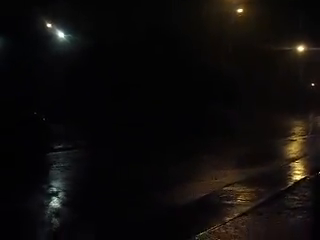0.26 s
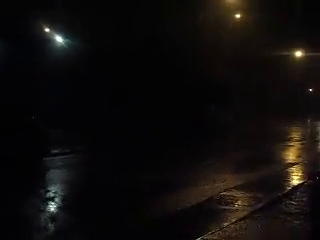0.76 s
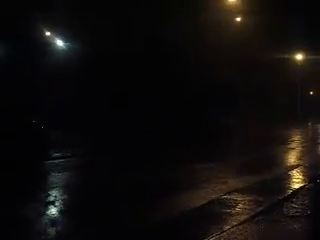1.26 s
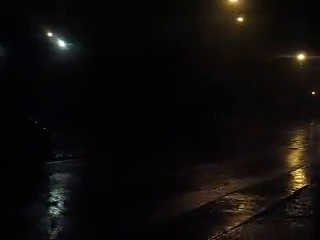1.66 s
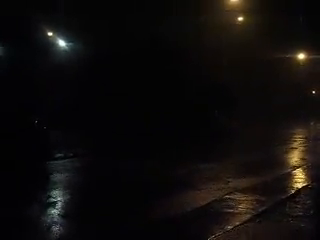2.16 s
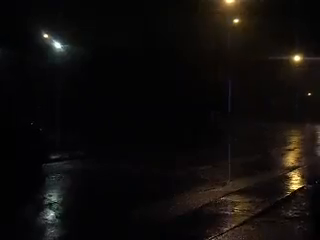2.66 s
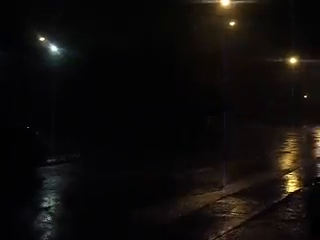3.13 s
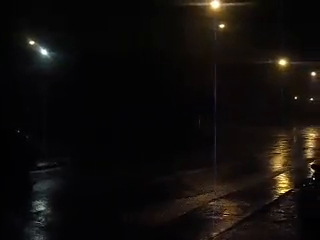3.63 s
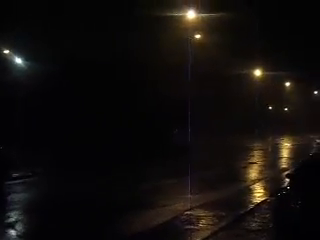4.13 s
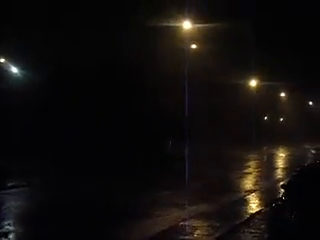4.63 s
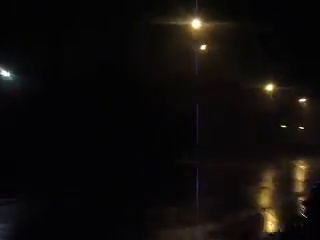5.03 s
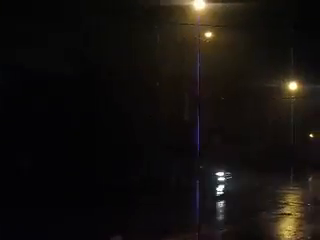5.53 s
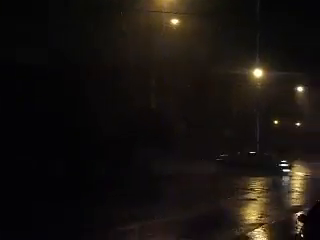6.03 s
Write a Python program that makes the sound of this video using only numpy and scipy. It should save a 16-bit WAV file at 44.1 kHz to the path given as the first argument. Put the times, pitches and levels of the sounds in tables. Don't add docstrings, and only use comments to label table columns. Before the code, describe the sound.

A small, dull camera microphone in a tight car cabin catches a downpour: continuous roof patter, sharp glassy ticks with tiny splashes, irregular body thumps with wet scraping, and a broad rainy hiss from the street. A low rumble slowly rises as a car approaches. The rain swells and eases, breaks off abruptly just after five seconds, and comes back suddenly, ending at its heaviest. Mono, dry, slightly grainy treble.

```python
import sys
import numpy as np
from scipy import signal
from scipy.fft import rfft, irfft
from scipy.io import wavfile
from scipy.ndimage import uniform_filter1d

SR = 44100
rng = np.random.default_rng(int(sys.argv[2]) if len(sys.argv) > 2 else 0)


def linear_from_db(decibels):
    return 10 ** (np.asarray(decibels, float) / 20)


def dump(signal):
    limited = np.clip(np.atleast_2d(signal).T, -1, 1)
    pcm = np.round(limited * 32767).astype(np.int16)
    wavfile.write(sys.argv[1], SR, pcm)


N = 277389


def evened(x):
    return x / np.sqrt(np.mean(x ** 2) + 1e-20)


def read(points, hz):
    f, value = np.transpose(points)
    return np.interp(np.log(hz + 1), np.log(f + 1), value)


def coloured(x, gain):
    return irfft(rfft(x) * gain(np.fft.rfftfreq(len(x), 1 / SR)), len(x))


def band(x, lo_hz, hi_hz):
    return signal.sosfilt(signal.butter(2, [lo_hz, hi_hz], "bandpass", fs=SR, output="sos"), x)


def add(mix, start_s, sound):
    part = mix[round(start_s * SR):][:len(sound)]
    part += sound[:len(part)]


def clicks(per_s, spread_db):
    size = linear_from_db(spread_db * np.minimum(rng.exponential(1, N), 4))
    return size * (rng.random(N) < per_s / SR)


# t/s, level/dB
RAIN_STRENGTH = [(0.0, -41), (0.45, -39), (1.03, -35.5), (1.38, -40.5), (1.78, -37.5), (2.05, -41.5),
                 (2.35, -42.5), (2.601, -38.5), (2.92, -38), (3.24, -38), (3.73, -41.5), (4.2, -40),
                 (4.57, -41), (4.9, -42.5), (5.36, -40.5), (5.62, -36.5), (5.9, -35), (6.29, -34)]
USUAL_DB = -39


def strength_db(follows):
    s, db = np.transpose(RAIN_STRENGTH)
    return follows * (np.interp(np.arange(N) / SR, s, db) - USUAL_DB)


# f/Hz, width/Hz, level/dB
ROOF_MODES = [(830, 110, -4), (849, 200, -5), (1025, 200, -4.5), (1292, 370, -2), (542, 220, -11)]


def roof(hits, shift):
    t = np.arange(800) / SR
    out = 0
    for hit, stretch, (hz, width_hz, db) in zip(hits, shift, ROOF_MODES):
        mode = np.exp(-np.pi * width_hz * t) * np.sin(2 * np.pi * hz * stretch * t)
        out = out + linear_from_db(db) * signal.oaconvolve(hit, mode)[:len(hit)]
    return out


def drumming():
    hits = [clicks(260, spread_db=3.5) for _ in ROOF_MODES]
    return linear_from_db(-43.0 + strength_db(0.91)) * evened(roof(hits, np.ones(len(ROOF_MODES))))


def ring(hz, rise_s, fall_s):
    t = np.arange(-40, 300) / SR
    envelope = np.exp(-(np.minimum(t, 0) / rise_s) ** 2 - np.maximum(t, 0) / fall_s)
    return -envelope * np.cos(2 * np.pi * hz * t)


def cabin(rings, splashes):
    t = np.arange(3000) / SR
    onset = 1 - np.exp(-(t / 0.00072) ** 2)
    decay = linear_from_db(-60 * t / [[.06], [.036]])
    tail, spray = rng.standard_normal((2, 3000)) * onset * decay
    wet = linear_from_db(-5.0) * signal.oaconvolve(rings, tail / np.linalg.norm(tail))
    wet += linear_from_db(-2.5) * signal.oaconvolve(splashes, spray / np.linalg.norm(spray))
    return rings + splashes + wet[:N]


# t/s, ring level/dB, ring f/Hz, splash
# level/dB
GLASS_DROPS = [(0.1268, -22, 2800, -38), (0.2614, -16, 2770, -30), (0.5807, -30, 2580, -42),
               (0.6441, -18, 2780, -34), (0.8053, -31, 2870, -42), (0.8789, -29, 2540, -42),
               (1.1526, -28, 2900, -34), (1.822, -32, 2970, -47), (2.022, -29, 2890, -38),
               (2.1925, -28, 2900, -43), (2.2268, -28, 2590, -44), (2.4066, -31, 3050, -37),
               (2.5148, -21, 2540, -36), (2.6592, -24, 2570, -43), (2.7061, -26, 2970, -39),
               (2.7601, -22, 2930, -35), (2.7742, -14, 2350, -35), (2.854, -31, 2470, -47),
               (2.8919, -28, 2730, -43), (3.0436, -27, 2760, -33), (3.3146, -31, 3010, -43),
               (3.5114, -30, 3060, -36), (3.5914, -31, 2800, -38), (3.6374, -32, 2090, -40),
               (3.801, -22, 2500, -43), (3.974, -31, 2530, -45), (4.0839, -31, 2770, -36),
               (4.4648, -26, 2710, -42), (4.514, -32, 2190, -39), (5.7285, -28, 2650, -32)]
# t/s, splash level/dB
FLAT_BURSTS = [(0.2123, -33), (0.4367, -36), (0.6859, -37), (0.8539, -36), (0.9236, -38), (1.1893, -34),
               (1.4646, -33), (1.9663, -34), (2.1671, -36), (2.3065, -41), (2.9239, -34), (3.1259, -33),
               (3.2543, -39), (3.4805, -37), (4.2854, -32), (4.3332, -36), (4.3476, -30), (4.4496, -38),
               (4.7519, -41), (6.1364, -40), (6.2196, -36)]
BURST_RING_DB, BURST_RING_HZ = -1.0, 2850
# delay t/s, ring level/dB, splash level/dB
CABIN_ECHOES = [(.0042, -10, -5), (.0081, -16, -8)]


def drops():
    rings, splashes = np.zeros(N), np.zeros(N)
    bursts = [(s, db + BURST_RING_DB, BURST_RING_HZ, db) for s, db in FLAT_BURSTS]
    every = GLASS_DROPS + bursts
    paths = [(0.00061, 0.016, 0.0018)] + CABIN_ECHOES
    chance = rng.uniform(-1, 1, (len(every), len(paths), 3))
    for (s, ring_db, hz, splash_db), luck in zip(every, chance):
        for (delay_s, less_db, duller_db), (a, b, c) in zip(paths, luck):
            at_s = s - 40 / SR + delay_s * (1 + .1 * a)
            level = linear_from_db(ring_db + 1.8 + less_db * (1 + .3 * b))
            add(rings, at_s, level * ring(hz, .00024, .00034))
            level = linear_from_db(splash_db + 2.5 + duller_db * (1 + b))
            add(splashes, at_s, level * ring(6700 + 900 * c, .00006, .0001))
    for hz in (2300, 2750, 3200):
        patter = clicks(45, spread_db=4.0)
        rings += linear_from_db(-51) * signal.oaconvolve(patter, ring(hz, .00028, .00043))[:N]
    for hz in (5500, 6900, 8400):
        patter = clicks(17, spread_db=5.0)
        splashes += linear_from_db(-60) * signal.oaconvolve(patter, ring(hz, .00008, .00023))[:N]
    return cabin(rings, splashes)


# t/s, peak level/dB, low share/dB, scrape/dB
WIPER_THUMPS = [(0.424, -30.5, 1.5, -6.5), (1.033, -26.5, -10, -19), (1.135, -21, -12.5, -12),
                (1.272, -27.5, -16.5, -18.5), (1.44, -27, -12.5, -23), (1.591, -21, -27, -24),
                (2.17, -20, -6, -21), (2.789, -29.5, -13, -11), (3.367, -22, -21, -24),
                (3.953, -23, -12, -22), (4.539, -21.5, -3, -21), (5.714, -22, -22.5, -12.5),
                (6.024, -22, -12.5, -21)]
# f/Hz, level/dB
THUMP_COLOUR = [(60, -36), (200, -7.5), (500, -13.5), (1500, -12.5), (3000, 6.5), (4400, -12.5),
                (6000, -15), (10000, -34.5)]


def thumps():
    out, t = np.zeros(N), np.arange(5000) / SR
    envelope = (1 - np.exp(-t / 0.005)) * np.exp(-(t / 0.041) ** 2)
    chances = rng.standard_normal((len(WIPER_THUMPS), len(ROOF_MODES) + 2, len(t)))
    for (s, db, low_db, scrape_db), chance in zip(WIPER_THUMPS, chances):
        rattle = evened(roof(chance[1:-1] ** 3, 1 + 0.057 * chance[-1]))
        wide = coloured(chance[0], lambda f: linear_from_db(read(THUMP_COLOUR, f)))
        push, scrape = evened(band(wide, 70, 360)), evened(band(wide, 1500, 9500))
        blow = rattle + linear_from_db(low_db - 2.0) * push + linear_from_db(scrape_db + 0.5) * scrape
        add(out, s, linear_from_db(db - 8.5) * envelope * blow)
    return out


# f/Hz, level/dB per Hz
WASH_COLOUR = [(12, -45.5), (20, -6.5), (81, -7), (177, -1.5), (498, -6), (816, -0.5), (1110, 1),
               (1560, -12.5), (2760, -11.5), (4290, -27), (5700, -20.5), (7990, -28), (9090, -34),
               (9830, -33), (12800, -70.5), (21600, -120)]
NEARING_DB, NEARING_DB_PER_S = -3, 0.93


def wash(patchy_db=1.17, flicker_db=1.15):
    frames = N // 128 + 5
    a, b, patches = rng.standard_normal((frames, 257, 3)).T
    patches = uniform_filter1d(patches, size=6, axis=0)
    patches = evened(uniform_filter1d(patches, size=20, axis=1))
    flicker = evened(uniform_filter1d(rng.standard_normal(frames), size=5))
    z = (a + 1j * b) * linear_from_db(patchy_db * patches + flicker_db * flicker)
    noise = signal.istft(z, nperseg=512, noverlap=384)[1][:N]
    noise = coloured(noise, lambda f: linear_from_db(read(WASH_COLOUR, f)))
    rumble = coloured(noise, lambda f: 1 / np.sqrt(1 + (f / 520) ** 6))
    deep = coloured(rumble, lambda f: 1 / (1 + (f / 120) ** 4))
    rumble = rumble + (linear_from_db(NEARING_DB + NEARING_DB_PER_S * np.arange(N) / SR) - 1) * deep
    body = coloured(noise, lambda f: 1 / np.sqrt((1 + (f / 1500) ** 6) * (1 + (520 / (f + 1)) ** 6)))
    hiss = coloured(noise, lambda f: 1 / np.sqrt(1 + (1500 / (f + 1)) ** 6))
    out = linear_from_db(-42.5 + strength_db(0.29)) * evened(rumble)
    out += linear_from_db(-43.5 + strength_db(0.98)) * evened(body)
    return out + linear_from_db(-45.5 + strength_db(0.32)) * evened(hiss)


def scene():
    return (drumming() + drops() + thumps() + wash())[None]


BLOCK, SHORT, GRID = 2048, 256, 1292
# f/Hz, long-block level/dB, short-block level/dB
ROUNDING_STEP = [(500, -14, -12), (2500, -9, -7), (4500, 2.5, 2), (7000, 4.5, 5), (9000, 7, 8.5),
                 (10300, 5, 7.5)]


def rounded(x, size, column, top_hz, jitter_db):
    n, k = np.arange(2 * size), np.arange(round(top_hz * 2 * size / SR))
    window = np.sin(np.pi * (n + .5) / (2 * size))
    basis = window * np.cos(np.pi / size * (n + .5 + size / 2) * (k[:, None] + .5))
    basis = (basis * np.sqrt(2 / size)).astype(np.float32)
    lines = np.lib.stride_tricks.sliding_window_view(x, 2 * size)[::size] @ basis.T
    group, width = np.arange(len(lines)) * size // BLOCK, size // 64
    power = uniform_filter1d(lines ** 2, size=5 * width, axis=1)
    level = np.add.reduceat(abs(power) ** .5, np.arange(0, len(lines), BLOCK // size))
    level = level * size / BLOCK + 1e-7
    luck = rng.standard_normal((len(level), len(k) // width + 1)).repeat(width, 1)[:, :len(k)]
    luck = (luck + np.roll(luck, 1, axis=0)) / np.sqrt(2)
    rule_db = read([(row[0], row[column]) for row in ROUNDING_STEP], k * SR / (2 * size))
    step = (level * linear_from_db(rule_db + jitter_db * luck))[group]
    blocks = (np.sign(lines) * np.floor(abs(lines) / step + 0.45) * step) @ basis
    out = np.zeros((len(lines) + 1, size))
    out[:-1] += blocks[:, :size]
    out[1:] += blocks[:, size:]
    return out.ravel()


def camera_rounding(x, attack_db=2.6):
    x = np.pad(x, (2 * BLOCK - GRID, 3 * BLOCK - (N - GRID) % BLOCK)).astype(np.float32)
    steady = rounded(x, BLOCK, column=1, top_hz=10000, jitter_db=3.5)
    late = BLOCK // 2
    shifted = np.roll(x, -late)
    quick = np.roll(rounded(shifted, SHORT, column=2, top_hz=10250, jitter_db=2.2), late)
    power = (band(shifted, 3500, 9500) ** 2).reshape(-1, SHORT).mean(1) + 1e-14
    jump = power / np.roll(uniform_filter1d(power, size=8), 5) > linear_from_db(2 * attack_db)
    share = np.roll(jump.reshape(-1, BLOCK // SHORT).any(1).repeat(BLOCK), late)
    share = uniform_filter1d(share * 1., size=SHORT)
    return (steady + share * (quick - steady))[2 * BLOCK - GRID:][:N]


MIRROR_EDGES_HZ = (11950, 12350)


def rate_mirror(x):
    flipped = x * (-1.) ** np.arange(N)

    def slope(f):
        return np.interp(f, MIRROR_EDGES_HZ, (1, .3), left=.3, right=0) * (f > 11600)
    return linear_from_db(-23) * coloured(flipped, slope)


CUT_S, BACK_S = 5.022, 5.3465
AFTER_DB, AFTER_DB_PER_S, AFTER_S = -26, 1500, .008
BEFORE_DB, BEFORE_DB_PER_S, BEFORE_S = -37, 130, .068


def dropout():
    t = np.arange(N) / SR
    after = (t < CUT_S + AFTER_S) * linear_from_db(AFTER_DB - AFTER_DB_PER_S * np.clip(t - CUT_S, 0, AFTER_S))
    before = (t > BACK_S - BEFORE_S) * linear_from_db(BEFORE_DB - BEFORE_DB_PER_S * np.maximum(BACK_S - t, 0))
    return uniform_filter1d(np.where((t < CUT_S) | (t > BACK_S), 1, after + before), size=40)


def band_limit(x):
    return signal.sosfilt(signal.butter(12, 12400, fs=SR, output="sos"), x)


def record(dry):
    heard = coloured(dry[0], lambda f: f / np.hypot(f, 12))
    kept = camera_rounding(heard)
    kept = kept + rate_mirror(kept)
    return band_limit(kept[None] * dropout())


dry = scene()
out = record(dry)
dump(out)
```